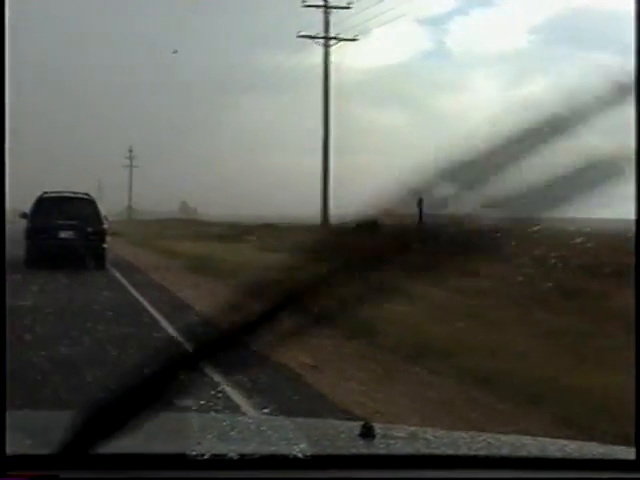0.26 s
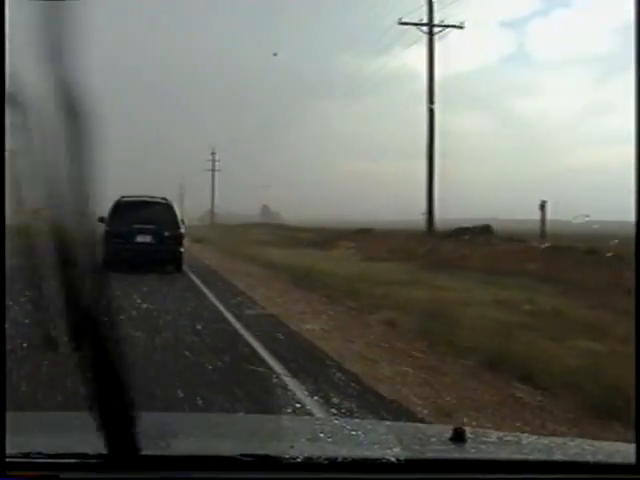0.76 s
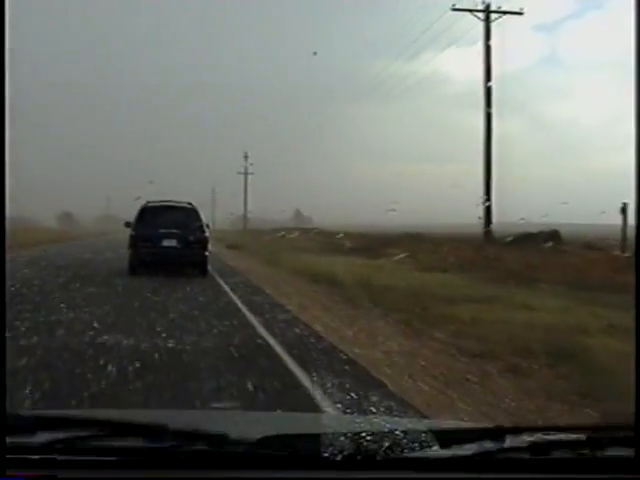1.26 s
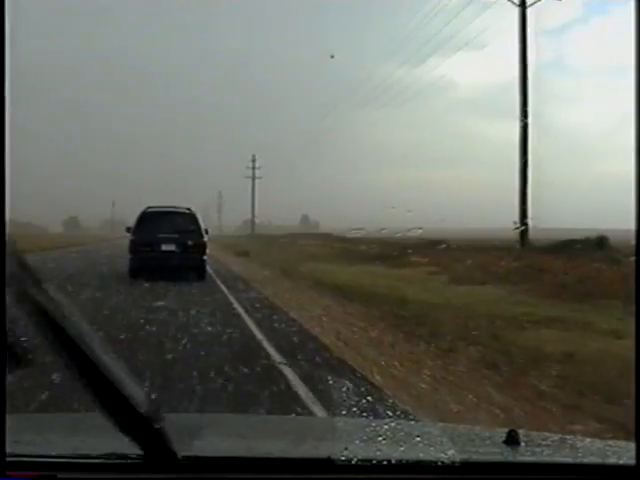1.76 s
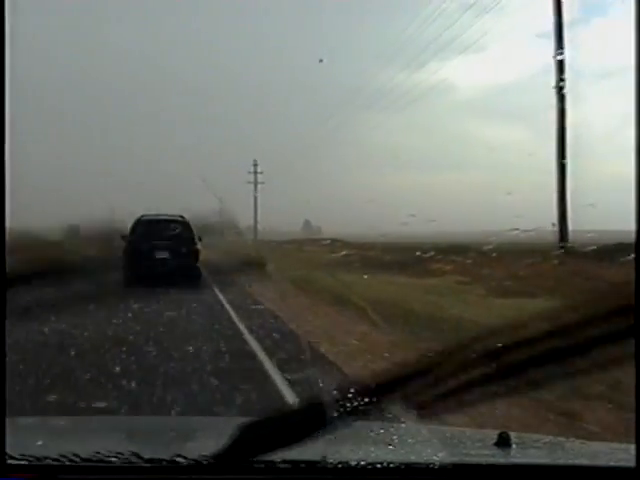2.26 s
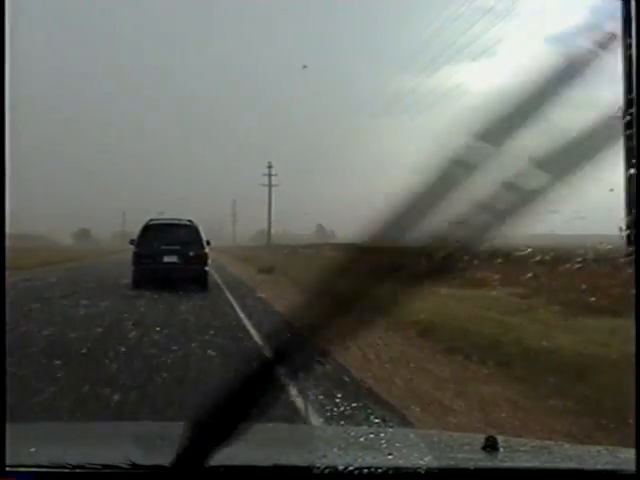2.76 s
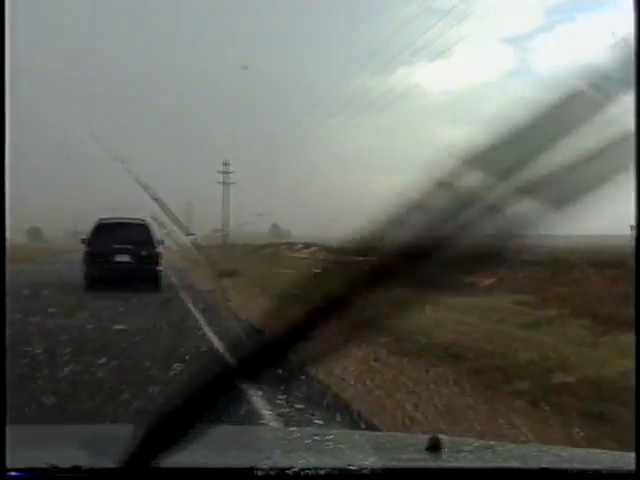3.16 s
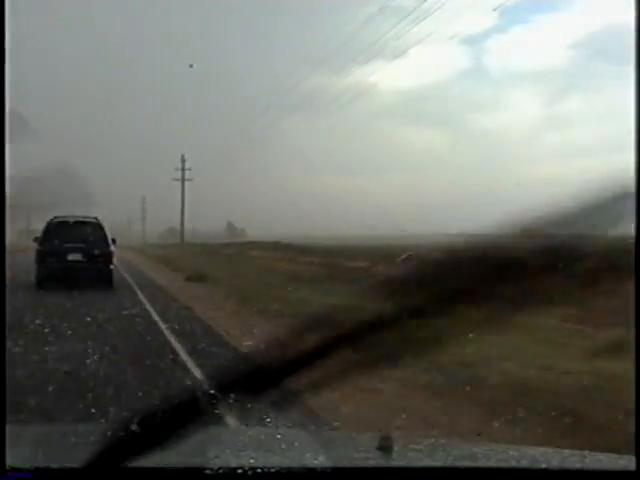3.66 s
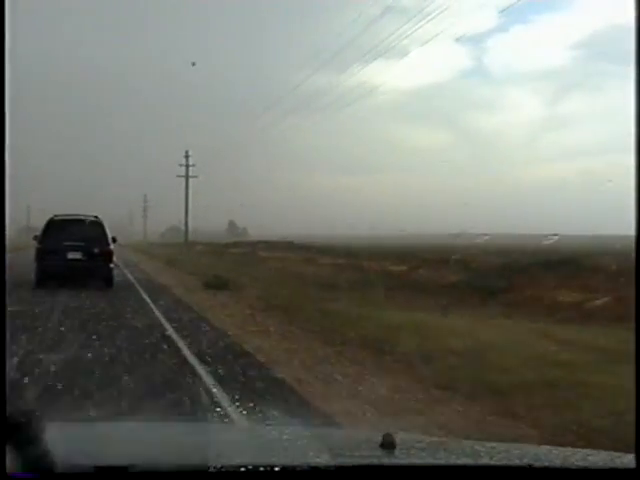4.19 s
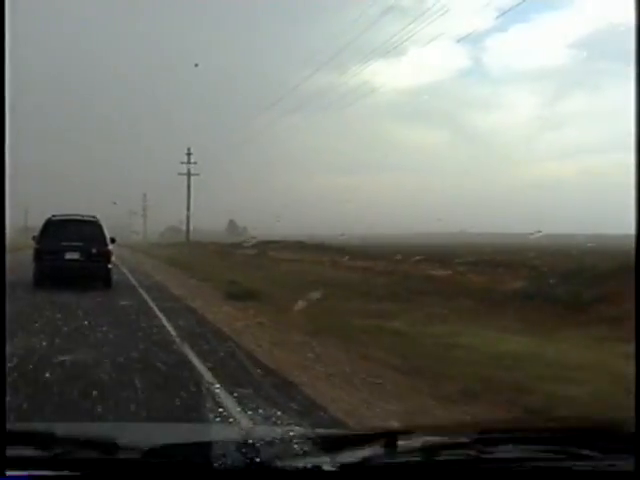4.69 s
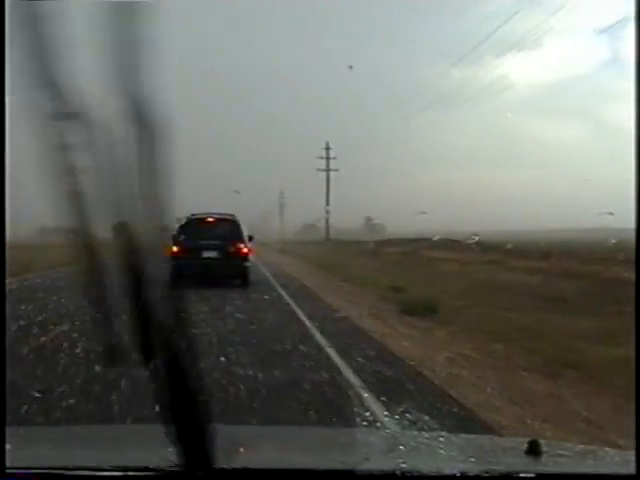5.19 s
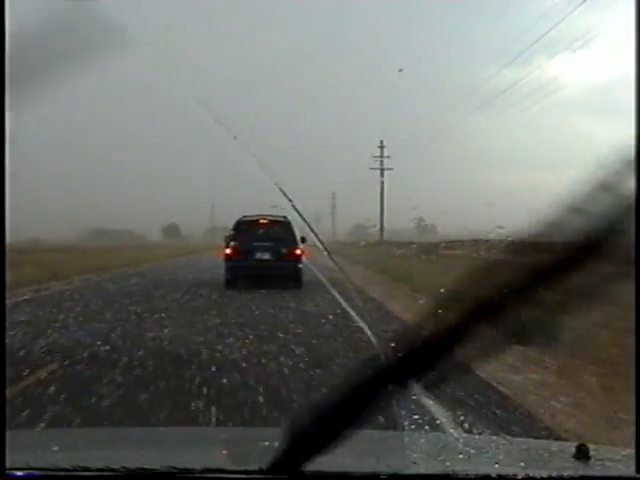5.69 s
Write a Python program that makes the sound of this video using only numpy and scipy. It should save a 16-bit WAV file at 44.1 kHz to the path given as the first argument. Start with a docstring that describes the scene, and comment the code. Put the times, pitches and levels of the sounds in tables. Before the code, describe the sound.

Close, boxy car interior during hail. Low tyre and wind rumble with soft spray hiss and fine ice patter runs throughout, the rumble swelling around 2.8 and 4.3 s, the hiss thicker near 5.3 s. Loud hollow steel knocks land at once, at 0.03, 0.2 and 0.6 s, each ringing briefly, with faint pellet clicks between. The first bright windshield crack comes at 1.3 s, a duller heavy one at 1.8 s. Lighter knocks, clicks and crisp ice ticks scatter through 2.2-2.8 s; a strong glass crack hits at 3.1 s, another at 3.6 s. Four heavy roof bangs crowd 4.0-4.3 s, then a sharp crack at 4.7 s. After a lighter gap, a dull loud thud falls at 5.4 s, followed by ticks, a knock near 5.6 s and small final hits at 5.9 s. Loud blows sound slightly squashed and duck the background, which slowly recovers; very faint hiss and a barely audible high whistle remain.

```python
"""Hail hits a moving car, heard from inside. Throughout, tyres and wind rumble (shaped noise) under spray hiss
and ice patter (noise snaps). Roof and hood knocks start at once, small pellets click between them;
from 1.1 s ice chips tick (band-passed noise), from 1.3 s stones crack on the windshield.
Blows are decaying noise bands, with sine modes for the stones. The camera's gain control ducks
after the loudest blows and slowly recovers; faint hiss and a whistle stay underneath."""
import sys
import numpy as np
from scipy import signal
from scipy.fft import rfft, irfft, next_fast_len
from scipy.io import wavfile
from scipy.ndimage import uniform_filter1d, map_coordinates

SR = 44100
rng = np.random.default_rng(int(sys.argv[2]) if len(sys.argv) > 2 else 0)


def master_out(mix):
    """Clip the mix to full scale and print it as 16-bit PCM to the path in sys.argv[1]."""
    frames = np.transpose(np.atleast_2d(mix))
    ceiling = np.clip(frames, -1, 1)
    pcm = np.round(ceiling * 32767).astype(np.int16)
    wavfile.write(sys.argv[1], SR, pcm)


N = 261954

# All table levels are relative: trims, tone and the gain control follow.
# driving noise: (time [s], rumble [dB], spray [dB])
ROAD_LEVELS = [(0, -54, -56.5), (0.85, -55.5, -56), (1.25, -54, -56), (1.9, -51.5, -59), (2.8, -49, -61),
               (3.4, -54.5, -58), (4.3, -49, -55), (4.85, -56.5, -59.5), (5.3, -52, -54), (5.94, -51, -60)]
# tyre and wind colour: (frequency [Hz], density [dB per Hz])
RUMBLE_SPECTRUM = [(15, -3.5), (33, 10), (55, 12.5), (90, 5), (127, 9), (175, -5.5), (290, 3.5), (380, 1),
                   (420, -4), (1000, -9.5), (2000, -18), (4000, -60)]
# spray and ice colour: (frequency [Hz], density [dB per Hz])
SPRAY_SPECTRUM = [(500, -0.5), (1400, 1), (3400, 3.5), (4400, -1), (7500, -3.5), (10500, -10.5),
                  (13000, -14.5), (16000, -33)]
# roof and hood stones:
# (time [s], strength [dB], hardness [dB], flex [dB], boom [Hz], ring length [factor], rise [s])
METAL_STONES = [(0.031, -11.5, -4, -8, 551, 0.72, 0.00046), (0.1959, -10, -4, -6, 310.4, 0.88, 0.0015),
                (0.431, -24.5, -8.5, 1.5, 542, 1, 0.002), (0.494, -30, -12, -2, 537, 0.89, .0009),
                (0.542, -38.5, 4, 5, 567, 0.69, 0.00097), (0.621, -6.5, -6.5, -12.5, 363, 0.78, 0.00083),
                (0.955, -36.5, -22, 0.5, 306, 0.9, .0008), (1.403, -36, -5, 4.5, 189, 1, .0008),
                (1.639, -19.5, -7, -13.5, 380, 0.78, 0.0032), (2.206, -25.5, 0, -6, 230, 0.75, 0.0014),
                (2.234, -33.5, -7, 6.5, 221, 0.83, .0008), (2.658, -29, 0.5, -4.5, 245, 0.94, 0.0013),
                (2.675, -26, -8, -1.5, 217, 0.75, 0.00071), (2.707, -37, -7, 11, 212, 0.65, 0.0009),
                (2.764, -23.5, -2, -12, 119, 0.53, .0009), (3.466, -23.5, -11.5, -2.5, 131, 0.59, 0.00053),
                (3.728, -31, -1, -5.5, 147, 0.76, .0004), (3.75, -29.5, -2.5, -4.5, 311, 1, 0.00081),
                (3.818, -34.5, 1, -3.5, 570, 0.62, .0008), (4.044, -15.5, -0.5, -13.5, 270, 0.77, 0.00092),
                (4.121, -10.5, -8.5, -13, 488, 0.57, 0.00075), (4.1846, -11, -4.5, -10, 190, 0.75, 0.00033),
                (4.291, -14, -8, -5.5, 481, .6, 0.00055), (4.329, -31, 4.5, 3.5, 225.7, 0.91, .001),
                (5.074, -36, -7, -13, 563, 0.79, 0.0013), (5.143, -23.5, -9, -3.5, 483, 0.96, 0.0017),
                (5.404, -9, -15, -12.5, 378, 0.81, 0.0022), (5.579, -20.5, -3.5, -2, 207.6, 0.88, 0.0015),
                (5.916, -28.5, -3.5, -5, 273, 0.48, 0.0012)]
# steel radiation into the cabin: (frequency [Hz], level [dB per band])
METAL_TONE = [(60, -36), (130, -19), (370, -10.5), (800, -13), (1400, -8), (2200, -14.5), (3300, 1),
              (4300, -11.5), (7000, 1.5), (9000, -30.5), (11000, -21), (15000, -24)]
# steel ring before length factors: (frequency [Hz], t60 [s])
METAL_RING = [(100, 0.35), (300, 0.34), (900, 0.26), (2000, 0.18), (5000, 0.14), (14000, 0.13)]
# steel modes that can ping, before scatter: (frequency [Hz])
STEEL_MODES_HZ = [689, 932, 1322, 2053, 3060]
# clearest small pellets: (time [s], click [dB], fizz [dB])
CLEAR_PELLETS = [(0.131, -39, -34), (0.571, -53, -40), (0.868, -37, -43.5), (1.099, -49.5, -44.5),
                 (1.215, -45, -47), (1.258, -44, -50), (1.365, -28, -35), (1.424, -33, -36),
                 (1.492, -37, -46), (1.724, -34.5, -35.5), (2.014, -39.5, -39), (2.45, -29, -75),
                 (2.697, -28.5, -31), (2.746, -38, -30.5), (2.806, -38.5, -40.5), (2.862, -39.5, -46),
                 (2.951, -38, -52), (3.21, -38.5, -50), (3.354, -41, -52), (3.403, -34, -36.5),
                 (3.55, -36, -40.5), (3.603, -33.5, -38), (3.945, -31, -55), (4.246, -32, -34),
                 (4.515, -32.5, -38.5), (4.965, -42.5, -43), (5.026, -36.5, -43), (5.198, -45, -37),
                 (5.273, -41, -46), (5.351, -35, -47), (5.773, -33, -50)]
# ice chips ticking close by: (time [s], level [dB], pitch [Hz])
ICE_CHIPS = [(1.0623, -34.5, 10700), (2.2193, -22.5, 5200), (2.359, -35.5, 3700), (2.452, -40, 7260),
             (2.476, -32, 3400), (2.5251, -26, 4200), (3.2503, -46, 7050), (3.8875, -36, 7260),
             (4.343, -35, 6500), (4.361, -32.5, 5770), (4.374, -38, 6200), (4.6665, -44, 3800),
             (5.5983, -23, 5550), (5.6326, -26, 3210), (5.648, -47, 6370), (5.668, -38.5, 7800)]
# windshield stones: (time [s], strength [dB], hardness [dB], flex [dB], boom [Hz])
GLASS_STONES = [(1.3297, -16, 6, -1.5, 278), (1.552, -43.5, 13.5, -6, 330), (1.796, -6, -4.5, -8, 484),
                (2.336, -35, 5.5, 0, 308), (2.522, -33, -5, -17, 343), (2.644, -49, 17.5, -1, 248),
                (3.1027, -11, 2.5, -3.5, 409), (3.641, -20.5, 7, -6.5, 536), (3.894, -43, 19.5, 11, 526),
                (4.685, -13, 4.5, -1.5, 397), (5.532, -28, 6.5, -2, 287), (5.932, -24, 8, -6, 226)]
# glass radiation into the cabin: (frequency [Hz], level [dB per band])
GLASS_TONE = [(60, -39.5), (130, -21.5), (370, -13.5), (800, -12), (1400, -10.5), (2200, -18), (3300, -1),
              (4300, -12.5), (7000, -3.5), (9000, -24.5), (11000, -18.5), (15000, -24)]
# glass ring before length factors: (frequency [Hz], t60 [s])
GLASS_RING = [(100, 0.19), (300, 0.13), (900, 0.11), (3000, 0.076), (7000, 0.074), (14000, .05)]
# glass modes that can ping, before scatter: (frequency [Hz])
GLASS_MODES_HZ = [1300, 3800]
# panel and cabin resonances: (centre [Hz], width [Hz], gain [dB])
CABIN_MODES = [(134, 25, 6.5), (223.7, 6.1, 4.5), (341.6, 26, 5), (970, 34, 1.5), (1913, 156, 5),
               (2860, 260, 2.5)]
# microphone in the camera's housing: (frequency [Hz], gain [dB])
MIC_RESPONSE = [(2400, 0), (3550, 2), (4100, -3.5), (4700, -3), (5300, 0), (6200, -1), (7700, 1),
                (9000, -4), (10300, 1), (12000, -2), (16000, -4)]

BANDS_HZ = np.geomspace(60, 15360, 17)
LEAD_S = 0.01  # room for the swell ahead of each blow
FIZZ_DB, FIZZ_DB_PER_HARDNESS_DB = -8.5, 1.43  # fizz of shattering ice against the knock
HARDNESS_DB_PER_OCTAVE = 5.5  # hardness that moves the ping target up an octave
PING_SCATTER = 0.0578  # relative spread of ping pitch: panels differ a little
STEEL_PATCHY_DB, GLASS_PATCHY_DB = 2, 2.5  # spread between mode groups at a landing spot
EARLY_COPY_DB = -23  # level of the faint early copy of a knock
PELLET_RING = 1.65  # ring length against the windshield's
# stray pellets: click over the spray, scatter either way, fizz against click
STRAY_DB, STRAY_SPREAD_DB, STRAY_FIZZ_DB = 5.5, -4, -1
# gain control, then fast limiter: threshold, smoothing time constant, recovery
CEILING_DB, ATTACK_S, RECOVERY_DB_PER_S = -18, 0.0031, 14.5
LIMIT_DB, LIMIT_ATTACK_S, LIMIT_RECOVERY_DB_PER_S = -17, 0.00031, 700
HISS_DB = -74.5  # rms before the band limit
WHISTLE_HZ, WHISTLE_DB = 15734, -84  # line-scan whistle, rms
TOP_HZ = 15900


def amp(db):
    """Decibels to gain."""
    return 10 ** (np.asarray(db) / 20)


def unit(x):
    """Scale each row to rms 1."""
    return x / np.sqrt(np.mean(x ** 2, axis=-1, keepdims=True) + 1e-20)


def along(points, hz):
    """Read (Hz, value) points on a log frequency axis."""
    f, values = np.transpose(points)
    return np.interp(np.log(hz + 1), np.log(f + 1), values)


def curves(rows):
    """One value per sample for each column after the time."""
    times_s, *columns = np.transpose(rows)
    return [np.interp(np.arange(N) / SR, times_s, c) for c in columns]


def decay(t, t60_s):
    """Exponential decay, 60 dB down at t60_s."""
    return np.exp(-np.log(1000) * t / t60_s)


def filtered(x, response):
    """Apply a response of frequency to x."""
    size = next_fast_len(N + SR // 2)
    spectrum = rfft(x, size) * response(np.fft.rfftfreq(size, 1 / SR))
    return irfft(spectrum, size)[:N]


def add(track, s, sound):
    """Mix a sound into the track at time s."""
    part = track[max(0, round(s * SR)):][:len(sound)]
    part += sound[:len(part)]


def wobble(rate_hz):
    """Smooth random curve, rate_hz knots a second."""
    knots = rng.standard_normal(int(N * rate_hz / SR) + 4)
    return map_coordinates(knots, [np.arange(N) * rate_hz / SR])


def rush(spectrum):
    """Noise of rms 1 with the given colour."""
    return unit(filtered(rng.standard_normal(N), lambda hz: amp(along(spectrum, hz))))


def road(rumble_db=3.0, hiss_db=-3, patter_db=4.0):
    """Tyres and wind shake the car; spray and fine ice wash over it."""
    rumble_level_db, spray_level_db = curves(ROAD_LEVELS)
    bumps_db = 2.2 * wobble(rate_hz=10)
    low = amp(rumble_level_db + rumble_db + bumps_db) * rush(RUMBLE_SPECTRUM)
    wash = amp(hiss_db) * rush(SPRAY_SPECTRUM) + amp(patter_db) * patter()
    return low + amp(spray_level_db) * wash


def patter(spread_db=9.5, t60_s=0.12, snap=0.38, count=400, size=3072):
    """Many ice grains and drops, each a noise snap with a short ring."""
    track, t = np.zeros(N), np.arange(size) / SR
    times_s = rng.uniform(0, N / SR, count)
    sizes = np.clip(rng.standard_normal(count), -2, 2)
    shape = decay(t, t60_s) + snap * decay(t, 0.0042)
    for s, z, grain in zip(times_s, sizes, rng.standard_normal((count, size))):
        add(track, s, amp(spread_db * z) * shape * grain)
    return unit(filtered(track, lambda hz: amp(along(SPRAY_SPECTRUM, hz))))


def band_split(size):
    """Overlapping half-octave bands whose powers sum to one."""
    pitch = np.log(np.fft.rfftfreq(size, 1 / SR) + 1)
    edges = np.log(np.r_[BANDS_HZ[0] / 2, BANDS_HZ])
    return np.sqrt([np.interp(pitch, edges, row) for row in np.eye(len(edges))[1:]])


def blow(split, colour, tone, t60_s, rise_s, lag_s, patchy_db, snap, count=130):
    """A struck panel: crowded modes at fresh strengths swell and die away, band by band."""
    size = 2 * split.shape[1] - 2
    # each landing spot favours its own groups of modes, count groups in all
    place = count * np.sqrt(np.linspace(0, 1, split.shape[1]))
    group_db = patchy_db * np.interp(place, np.arange(count), rng.standard_normal(count))
    modes = irfft(split * amp(group_db) * rfft(rng.standard_normal(size)))
    # bending-wave speed grows with the root of frequency; lag_s is the delay at 1 kHz
    slow = np.sqrt(1000 / BANDS_HZ)[:, None]
    age = np.arange(size) / SR - LEAD_S - lag_s * slow
    since = np.maximum(age, 0)
    shape = (1 + np.tanh(age / (2 * rise_s))) * decay(since, t60_s[:, None])
    shape /= shape.max(axis=1, keepdims=True)
    # ice shatters on contact: a brighter start
    shape *= 1 + snap / slow * np.exp(-since / 0.00047)
    level = amp(along(colour, BANDS_HZ) + along(tone, BANDS_HZ))
    strength = level * np.sqrt(np.mean(shape ** 2, axis=1))
    return strength @ unit(modes * shape)


def stone(strength, hardness, flex):
    """Strength, hardness and flex set the balance from thump to fizz: (Hz, dB)."""
    fizz = strength + FIZZ_DB + FIZZ_DB_PER_HARDNESS_DB * hardness
    return [(280, strength + flex), (800, strength), (2600, strength + hardness), (5500, fizz)]


def ping(modes_hz, reach_hz, hardness):
    """A harder stone has a shorter contact and picks out a higher mode."""
    octaves = np.log2(np.array(modes_hz) / reach_hz) - hardness / HARDNESS_DB_PER_OCTAVE
    return modes_hz[np.argmin(abs(octaves))] * np.exp(PING_SCATTER * rng.standard_normal())


def mode(hz, t60_s, attack_s):
    """One damped panel mode: a decaying sine with a soft onset."""
    t = np.arange(SR // 3) / SR
    tone = np.sin(2 * np.pi * (hz * t + rng.random()))
    return tone * decay(t, t60_s) * (1 - np.exp(-t / attack_s))


def bodywork(boom_db=-4.0, ping_db=-7, reach_hz=2600, lag_s=0.001):
    """Sheet steel spreads the blow and rings on as a hollow knock."""
    track, split = np.zeros(N), band_split(size=16384)
    for s, strength, hardness, flex, boom_hz, ring, rise_s in METAL_STONES:
        colour = stone(strength, hardness, flex)
        knock = blow(split, colour, METAL_TONE, ring * along(METAL_RING, BANDS_HZ), rise_s, lag_s,
                     patchy_db=STEEL_PATCHY_DB, snap=0.043)
        add(track, s - LEAD_S, knock)
        ping_hz = ping(STEEL_MODES_HZ, reach_hz, hardness)
        for hz, share_db in (boom_hz, boom_db), (ping_hz, ping_db):
            tone = mode(hz, 0.64 * ring * along(METAL_RING, hz), attack_s=0.0012)
            add(track, s, amp(along(colour, hz) + share_db) * tone)
    # a faint copy of each knock 3.9 ms ahead lightly combs its tone
    return filtered(track, lambda hz: 1 + amp(EARLY_COPY_DB) * np.exp(2j * np.pi * hz * 0.0039))


def pellets(gain_db=-3, knock_db=-7, thump_db=-11, rise_s=0.00016, lag_s=0.00022):
    """Light pellets click but hardly move the panels."""
    track, split = np.zeros(N), band_split(size=6144)
    t60_s = PELLET_RING * along(GLASS_RING, BANDS_HZ)
    for s, click, fizz in list(CLEAR_PELLETS) + strays():
        colour = [(280, click + thump_db), (800, click + knock_db), (2600, click), (5500, fizz)]
        hit = blow(split, colour, GLASS_TONE, t60_s, rise_s, lag_s,
                   patchy_db=GLASS_PATCHY_DB, snap=0.06)
        add(track, s - LEAD_S, hit)
    return amp(gain_db) * track


def strays(count=40):
    """Faint pellets at random, stronger in thicker spray: (time [s], click [dB], fizz [dB])."""
    chance = rng.random((count, 2))
    when = (np.arange(count) + chance[:, 0]) / count  # one per equal time slot
    spray_db = curves(ROAD_LEVELS)[1][(when * N).astype(int)]
    click = spray_db + STRAY_DB + STRAY_SPREAD_DB * (2 * chance[:, 1] - 1)
    return list(zip(when * N / SR, click, click + STRAY_FIZZ_DB))


def chips(gain_db=1, t60_s=0.035, sharpness=4.0, soft_hz=8500, echo_db=-16, echo_t60_s=0.19, size=2048):
    """Ice chips tick as short resonant noise, with a faint slower answer from the cabin."""
    track, t = np.zeros(N), np.arange(size) / SR
    f = np.fft.rfftfreq(size, 1 / SR) + 1
    shape = decay(t, t60_s) + amp(echo_db) * decay(t, echo_t60_s)
    for s, db, hz in ICE_CHIPS:
        resonance = 1 / (1 + 1j * sharpness * (f / hz - hz / f))
        ring = irfft(rfft(rng.standard_normal(size)) * resonance)
        add(track, s, amp(db + gain_db) * unit(ring) * shape)
    return filtered(track, lambda hz: 1 / np.sqrt(1 + (hz / soft_hz) ** 6))


def windshield(gain_db=-2, boom_db=-4, ping_db=-5, reach_hz=1800, rise_s=0.00057, lag_s=0.00028):
    """Laminated glass is well damped: short, bright cracks."""
    track, split = np.zeros(N), band_split(size=8192)
    for s, strength, hardness, flex, boom_hz in GLASS_STONES:
        colour = stone(strength, hardness, flex)
        crack = blow(split, colour, GLASS_TONE, along(GLASS_RING, BANDS_HZ), rise_s, lag_s,
                     patchy_db=GLASS_PATCHY_DB, snap=0.02)
        add(track, s - LEAD_S, crack)
        # two modes with a belly at the landing spot stand out
        ping_hz = ping(GLASS_MODES_HZ, reach_hz, hardness)
        for hz, share_db in (boom_hz, boom_db), (ping_hz, ping_db):
            tone = mode(hz, 0.95 * along(GLASS_RING, hz), attack_s=0.00069)
            add(track, s, amp(along(colour, hz) + share_db) * tone)
    return amp(gain_db) * track


def cabin(hz):
    """Response of the resonances that colour stones and pellets."""
    return 1 + sum((amp(db) - 1) * 1j * hz * width / (centre ** 2 - hz ** 2 + 1j * hz * width)
                   for centre, width, db in CABIN_MODES)


def gain_control(x, ceiling_db, attack_s, recovery_db_per_s, size=176):
    """Sound over the ceiling turns the gain down; it climbs back at a steady rate."""
    level_db = 10 * np.log10(abs(uniform_filter1d(x ** 2, size)) + 1e-12)
    recovered_db = recovery_db_per_s * np.arange(N) / SR
    excess_db = np.maximum(level_db - ceiling_db, 0)
    cut_db = np.maximum.accumulate(excess_db + recovered_db) - recovered_db
    keep = np.exp(-1 / (attack_s * SR))
    return x * amp(-signal.lfilter([1 - keep], [1, -keep], cut_db))


def scene():
    """Hail through the cabin, over chips and the noise of driving."""
    blows = windshield() + bodywork() + pellets()
    return (filtered(blows, cabin) + chips() + road())[None]


def record(dry):
    """The camera colours, rides the gain, limits, saturates, adds hiss and whistle, and cuts the top."""
    heard = filtered(dry[0], lambda hz: amp(along(MIC_RESPONSE, hz)))
    ducked = gain_control(heard, CEILING_DB, ATTACK_S, RECOVERY_DB_PER_S)
    limited = gain_control(ducked, LIMIT_DB, LIMIT_ATTACK_S, LIMIT_RECOVERY_DB_PER_S)
    rounded = limited / (1 + (limited / 0.36) ** 4) ** (1 / 4)  # soft saturation towards 0.36
    whistle = np.sqrt(2) * np.sin(2 * np.pi * WHISTLE_HZ * np.arange(N) / SR)
    own_noise = amp(HISS_DB) * rng.standard_normal(N) + amp(WHISTLE_DB) * whistle
    return filtered(rounded + own_noise, lambda hz: hz < TOP_HZ)[None]


dry = scene()
out = record(dry)
master_out(out)
```